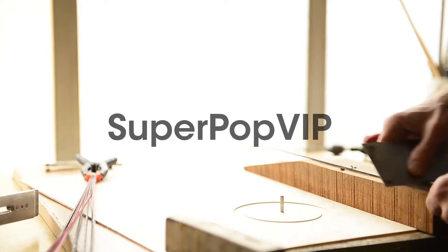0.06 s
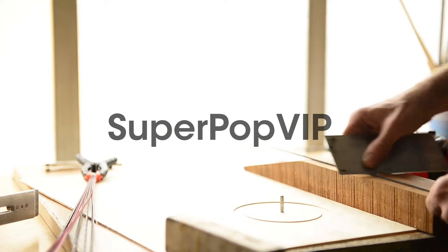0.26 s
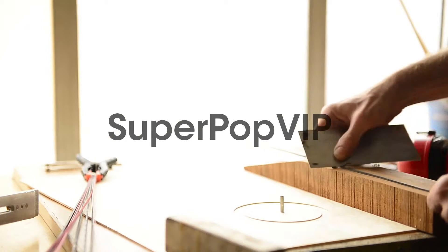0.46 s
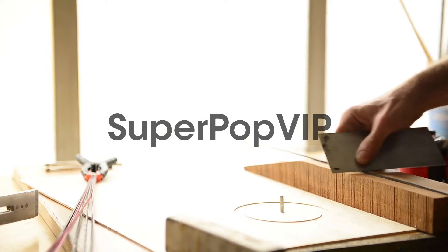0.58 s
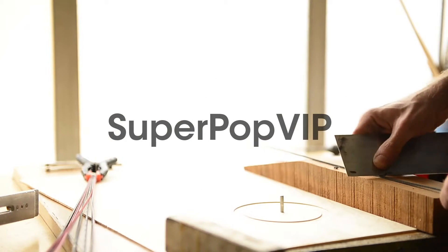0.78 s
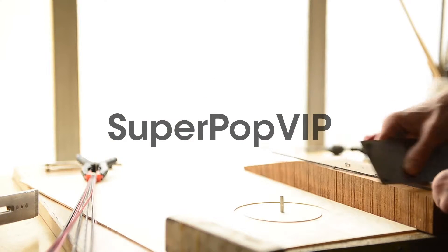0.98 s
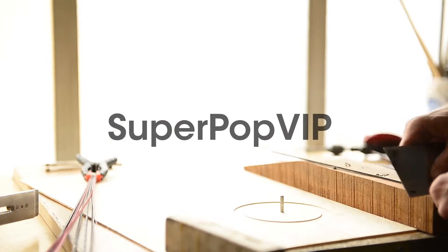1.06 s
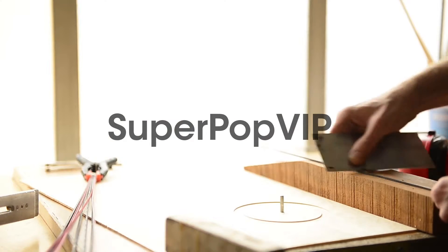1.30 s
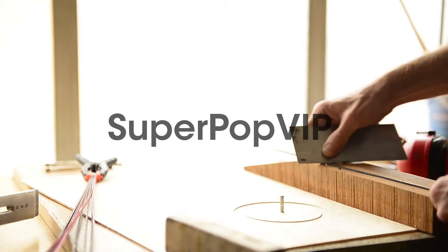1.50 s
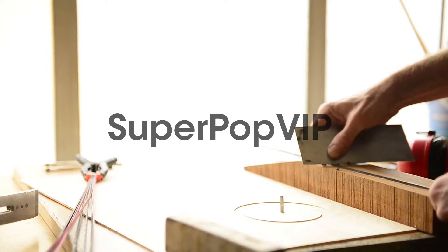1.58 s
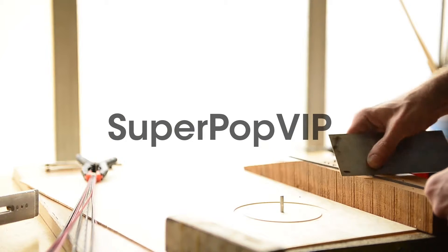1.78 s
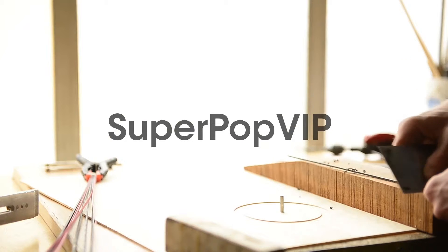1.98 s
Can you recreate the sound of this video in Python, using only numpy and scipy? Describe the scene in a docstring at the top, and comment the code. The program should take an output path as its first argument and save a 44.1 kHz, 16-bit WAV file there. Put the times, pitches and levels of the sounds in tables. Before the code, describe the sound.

A steel scraper rasps along wood twice, sliding lightly back after each stroke.

```python
"""In a small, quiet workshop, a steel card scraper takes two firm strokes along a wooden edge.
Tearing fibres make a dense rasp that rings the blade and, as the cut deepens, the wood.
Now and then the edge squeaks or catches. After each cut the blade slides back lightly.
A faint mains hum and room noise lie underneath."""
import sys
import numpy as np
from scipy import signal
from scipy.fft import rfft, irfft
from scipy.io import wavfile
from scipy.ndimage import map_coordinates

SR = 44100
rng = np.random.default_rng(int(sys.argv[2]) if len(sys.argv) > 2 else 0)


def file_out(sig):
    """Save sig as 16-bit WAV at sys.argv[1]."""
    # one column per channel
    cols = np.atleast_2d(sig).T
    # limit, then scale
    lim = np.clip(cols, -1, 1)
    pcm = np.round(lim * 32767).astype(np.int16)
    wavfile.write(sys.argv[1], SR, pcm)


N = 90404

# How loud each cut is as it goes: time_s, rasp_db, wood_db
FIRST_CUT = [(0.212, -59.5, -52.5), (0.242, -38, -49), (0.302, -26.5, -43.5), (0.332, -30, -45.5),
             (0.344, -29.5, -29), (0.366, -28.5, -39), (0.378, -28.5, -38), (0.442, -35, -41),
             (0.51, -68, -66)]
SECOND_CUT = [(1.178, -62.5, -67), (1.206, -44, -53), (1.26, -32.5, -47.5), (1.362, -29, -43),
              (1.38, -31.5, -45), (1.39, -29, -37), (1.412, -28, -42.5), (1.474, -34, -34.5),
              (1.54, -64, -64.5)]
# The overall tone of the rasp and of the wood: pitch_hz, level_db
RASP_TONE = [(50, -57), (150, -22), (600, -22), (1400, -17.5), (2100, -2.5), (2500, -4.5), (3000, -2),
             (3900, -1.5), (4700, -2), (6500, -1.5), (8300, 0.5), (9500, 5), (11200, 2), (12000, -1),
             (12550, -6), (13300, 3.5), (14100, 1.5), (15700, -2)]
WOOD_TONE = [(50, -50), (160, -15), (400, -11.5), (800, -5.5), (1300, -7.5), (2000, -1.5), (2800, -4),
             (4000, -19.5), (8000, -14), (15700, -30)]
# The pitches at which the wood rings: pitch_hz, width_hz, boost_db
WOOD_RINGS = [(924, 110, 4.5), (1100, 115, 15.5), (1579, 183, 16), (1786, 52, 4.5), (1941, 62, 9.5)]

def cuts(rasp_trim_db=-0.25, wood_trim_db=-3.0, turns_s=(0.35, 1.338), turn_length_s=0.029):
    """Tearing fibres ring blade and wood; the tone turns mid-cut as the contact point moves."""
    t = np.arange(N) / SR
    tear = fibres(per_s=9000, spread_db=2.5, clump_db=-0.53, clump_hz=300)
    early = unit(flex(colour(tear, RASP_TONE, blade_rings("early"))))
    late = unit(flex(colour(tear, RASP_TONE, blade_rings("late"))))
    rough_tear = fibres(per_s=9000, spread_db=2.5, clump_db=2.5, clump_hz=201)
    wood = unit(colour(rough_tear, WOOD_TONE, WOOD_RINGS))
    out = np.zeros(N)
    for cut, turn_s in zip((FIRST_CUT, SECOND_CUT), turns_s):
        times, rasp_db, wood_db = np.transpose(cut)
        late_share = .5 + .5 * np.tanh((t - turn_s) / turn_length_s)
        steel = np.sqrt(1 - late_share) * early + np.sqrt(late_share) * late
        out += steel * level(times, rasp_db + rasp_trim_db)
        out += wood * level(times, wood_db + wood_trim_db)
    return out


# Pitches the blade boosts or weakens early in a cut, late in a cut and on the way back:
# pitch_hz, width_hz, early_db, late_db, back_db
BLADE_RINGS = [(2070, 140, 7.5, 5.5, 10), (2336, 37, -6, 14.5, 5.5), (2827, 300, 9.5, 10, 9),
               (3030, 45, 11.5, 10, 7.5), (3287, 82, 15.5, 11.5, 3), (3425, 105, -43, -7.5, -21),
               (3634, 120, 8.5, 4, 5), (4380, 116, 6, 5, 3.5), (4900, 73, -4, 7.5, 6),
               (5570, 270, -3.5, -3, -3), (5670, 120, 6.5, 9.5, 5.5), (5980, 77, 11.5, 9, 11),
               (7130, 380, 9, 5, 6), (8030, 130, -5, 12, 11.5), (8600, 210, 1.5, 4.5, 5),
               (9170, 180, 9.5, 6.5, 9.5), (9614, 120, 12.5, 11, 14), (10620, 240, -5, 9, 8.5)]

def blade_rings(contact):
    """The blade rings differently depending on where it touches the wood."""
    column = ("early", "late", "back").index(contact)
    return [(hz, width, boosts[column]) for hz, width, *boosts in BLADE_RINGS]


def flex(x, share=.005, rate_hz=9):
    """The blade bends under the thumb, so its ringing drifts a little in pitch."""
    speed = 1 + share * wander(rate_hz)
    return map_coordinates(x, [np.cumsum(speed)], order=5, mode="mirror")


# Squeaks as the edge first bites: middle_s, half_length_s, level_db
SQUEAKS = [(0.245, 0.018, -45), (1.21, 0.018, -45.5), (1.26, 0.019, -39.5)]
# Their tone: pitch_hz, level_db
SQUEAK_TONE = [(500, -16), (1600, -30), (2100, 2), (2350, 17), (2600, -18.5), (3250, 4.5), (4200, -11),
               (9000, -23), (15700, -43.5)]

def squeaks():
    """Slips at the start of a cut ring the blade's lower pitches."""
    t = np.arange(N) / SR
    grip = sum(amp(db) * np.exp(-((t - s) / half) ** 2) for s, half, db in SQUEAKS)
    slips = fibres(per_s=7600, spread_db=2.0, clump_db=1.6, clump_hz=300)
    return grip * unit(colour(slips, SQUEAK_TONE, blade_rings("early")))


# Moments when the edge catches: start_s, length_s, strength_db
CATCHES = [(0.289, 0.031, -43.5), (0.333, 0.016, -35.5), (0.377, 0.0099, -33.5), (0.404, 0.013, -39),
           (1.386, 0.016, -38), (1.433, 0.0095, -46), (1.478, 0.0082, -48)]
# Their tone: pitch_hz, level_db
CATCH_TONE = [(50, -27), (160, -18), (600, -10.5), (1100, -11.5), (1700, 0), (2500, 0), (3400, 7),
              (5000, -12), (9000, -4.5), (15700, -32)]

def catches(gain_db=4.0):
    """The edge judders: short bursts of coarse slips shake blade and wood."""
    t = np.arange(N) / SR
    grip = sum(amp(db) * np.exp(-(2 * (t - s) / length - 1) ** 4) for s, length, db in CATCHES)
    slips = grip * fibres(per_s=6000, spread_db=2.2, clump_db=1.8, clump_hz=500)
    return amp(gain_db) * colour(slips, CATCH_TONE, blade_rings("late") + WOOD_RINGS)


# How loud each slide back is as it goes: time_s, hiss_db, ring_db
FIRST_SLIDE = [(0.54, -69, -71), (0.628, -53, -51.5), (0.64, -53.5, -57.5), (0.72, -54, -53.5),
               (0.776, -70.5, -70.5), (0.8, -76.5, -77)]
SECOND_SLIDE = [(1.63, -73, -79), (1.698, -56.5, -52.5), (1.706, -51.5, -58), (1.724, -54.5, -50),
                (1.806, -48, -49.5), (1.89, -65.5, -60), (1.938, -56, -62), (1.964, -69, -67),
                (1.98, -84, -78)]
# The tone of its hiss and of its lower ring: pitch_hz, level_db
SLIDE_HISS_TONE = [(200, -15), (2000, -10), (3450, -6.5), (4400, 0), (6500, -4), (9500, -1.5), (11000, -2),
                   (12400, -9), (14000, -2), (15700, -11)]
SLIDE_RING_TONE = [(50, -39), (200, -10.5), (800, 3), (1100, -2.5), (1500, -2.5), (1900, -7.5), (2300, 1),
                   (2850, 3), (3450, -8.5), (5000, -10), (15700, -40)]

def slides(hiss_trim_db=-0.65, ring_trim_db=-0.94):
    """The edge skims back lightly with a fine hiss, softly ringing blade and wood."""
    skim = fibres(per_s=20000, spread_db=2.5, clump_db=1.1, clump_hz=152)
    hiss = unit(flex(colour(skim, SLIDE_HISS_TONE, blade_rings("back"))))
    ring = unit(colour(skim, SLIDE_RING_TONE, blade_rings("back") + WOOD_RINGS))
    out = np.zeros(N)
    for slide in (FIRST_SLIDE, SECOND_SLIDE):
        times, hiss_db, ring_db = np.transpose(slide)
        out += hiss * level(times, hiss_db + hiss_trim_db)
        out += ring * level(times, ring_db + ring_trim_db)
    return out


# Moments when the blade touches down: start_s, strength_db
TOUCHES = [(0.196, -45.5), (1.122, -64), (1.151, -54), (1.162, -55.5)]
# Their tone: pitch_hz, level_db
TOUCH_TONE = [(150, -17), (700, 8), (1400, -5), (2300, 6.5), (3200, -4.5), (5500, -10), (9000, -16),
              (15700, -35)]

def touches(decay_s=.006, gain_db=5):
    """Steel lands on wood with soft knocks."""
    t = np.arange(N) / SR
    push = sum(amp(db) * (t >= s) * np.exp(-abs(t - s) / decay_s) for s, db in TOUCHES)
    return amp(gain_db) * colour(push * rng.standard_normal(N), TOUCH_TONE, blade_rings("early"))


# The bench takes the hand's weight: middle_s, half_length_s, pitch_hz, level_db
THUDS = [(0.222, 0.0083, 205, -49.5), (0.425, 0.031, 180, -61), (1.182, 0.0096, 250, -57),
         (1.202, 0.038, 206, -56.5), (1.47, 0.041, 228, -60)]

def thuds(drift_rad=0.33):
    """The bench booms faintly as pressure comes and goes."""
    t = np.arange(N) / SR
    out = np.zeros(N)
    for s, half, hz, db in THUDS:
        swell = amp(db) * np.exp(-((t - s) / half) ** 2)
        out += swell * np.sin(2 * np.pi * hz * t + drift_rad * wander(41))
    return out


# Swishes around the strokes: middle_s, half_length_s, level_db
SWISHES = [(0.0, 0.023, -60), (0.11, 0.077, -64), (0.966, 0.021, -70.5), (1.098, 0.1, -63),
           (2.023, 0.16, -63.5)]
# Their tone: pitch_hz, level_db
SWISH_TONE = [(500, -33), (2500, -11.5), (5500, -15.5), (7700, -6.5), (9600, -5), (12000, -13.5),
              (14000, -14), (15700, -18.5)]

def swishes():
    """A faint, high hiss swells as the hand turns round."""
    t = np.arange(N) / SR
    swell = sum(amp(db) * np.exp(-((t - s) / half) ** 2) for s, half, db in SWISHES)
    return swell * unit(colour(rng.standard_normal(N), SWISH_TONE))


# How long the room's echo takes to fade by 60 dB: pitch_hz, fade_s
ECHO_FADES = [(200, 0.94), (1500, 0.24), (4000, 0.23), (9000, 0.23), (15000, 0.15)]

def room_echo(x, gap_s=0.0036):
    """The room adds a short, blurred echo in which low pitches last longest."""
    hz, t, bands = signal.stft(rng.standard_normal(SR // 2), SR, nperseg=256)
    fade = amp(-60 * t / look_up(ECHO_FADES, hz)[:, None])
    tail = signal.istft(bands * fade, SR, nperseg=256)[1]
    tail *= np.arange(len(tail)) / SR > gap_s
    return signal.fftconvolve(x, tail / np.linalg.norm(tail))[:N]


# The notes in the hum: pitch_hz, level_db
HUM_NOTES = [(100, -71), (200, -69), (360, -69), (607, -75), (709, -64)]
# The tone of the room noise: pitch_hz, level_db
ROOM_NOISE_TONE = [(25, -17), (65, -19), (100, -4), (160, -6.5), (235, -2), (300, -7), (420, -8),
                   (680, -7.5), (1020, -11.5), (1550, -15.5), (3260, -26), (8000, -33), (15500, -38)]

def background(waver_db=2.5, drift_rad=0.22, noise_db=-58.5):
    """Mains and machines hum with a slight waver over steady room noise."""
    t = np.arange(N) / SR
    hum = np.zeros(N)
    for hz, db in HUM_NOTES:
        loudness = np.sqrt(2) * amp(db + waver_db * wander(6))
        hum += loudness * np.sin(2 * np.pi * (hz * t + rng.random()) + drift_rad * wander(3.4))
    return hum + amp(noise_db) * unit(colour(rng.standard_normal(N), ROOM_NOISE_TONE))


def fibres(per_s, spread_db, clump_db, clump_hz):
    """Tiny snaps of uneven size that come in louder and softer clumps."""
    snaps = (rng.random(N) < per_s / SR) * rng.choice([-1, 1], N)
    size_db = spread_db * np.minimum(rng.exponential(1, N), 4)
    return unit(snaps * amp(size_db + clump_db * wander(clump_hz)))


def colour(x, tone, rings=()):
    """Passes a sound through an object with an overall tone and ringing pitches."""
    hz = abs(np.fft.fftfreq(8192, 1 / SR))
    rings_db = sum(boost / (1 + (2 * (hz - pitch) / width) ** 2) for pitch, width, boost in rings)
    log_gain = np.log(amp(look_up(tone, hz) + rings_db))
    # The object's answer to one tap: the ringing comes after the tap, never before.
    response = np.fft.ifft(np.exp(np.conj(signal.hilbert(log_gain)))).real
    return signal.fftconvolve(x, response[:len(hz) // 2])[:N]


def wander(rate_hz):
    """A random drift of typical size 1, mostly slower than the given rate."""
    hz = np.fft.rfftfreq(N, 1 / SR)
    return unit(irfft(rfft(rng.standard_normal(N)) / (1 + (hz / rate_hz) ** 4), N))


def level(times, db, fade_db_per_s=700):
    """Loudness that follows the given points and dies away outside them."""
    t = np.arange(N) / SR
    outside_s = abs(t - np.clip(t, times[0], times[-1]))
    return amp(np.interp(t, times, db) - fade_db_per_s * outside_s)


def look_up(table, hz):
    """Finds a table's value at any pitch by blending between its rows."""
    pitches, values = np.transpose(table)
    return np.interp(np.log(hz + 1), np.log(pitches + 1), values)


def amp(db):
    """Turns decibels into a number to multiply by."""
    return 10 ** (np.asarray(db) / 20)


def unit(x):
    """Scales a sound to an average strength (rms) of 1."""
    return x / np.sqrt(np.mean(x ** 2) + 1e-20)


def scene(echo_db=-8.5):
    """The scraper, its echo and the workshop background, in one channel."""
    work = cuts() + squeaks() + catches() + slides() + touches() + thuds() + swishes()
    return (work + amp(echo_db) * room_echo(work) + background())[None]


def record(dry, top_hz=15750):
    """Removes the very highest treble."""
    low_pass = signal.firwin(801, top_hz, window=("kaiser", 9), fs=SR)
    return signal.oaconvolve(dry, low_pass[None], "same")


dry = scene()
out = record(dry)
file_out(out)
```